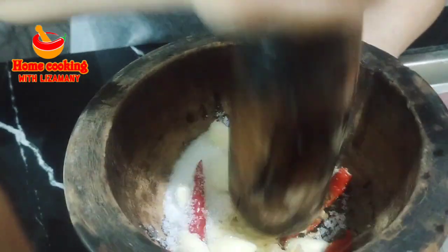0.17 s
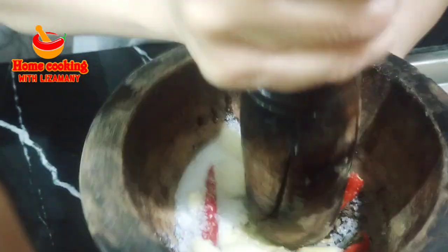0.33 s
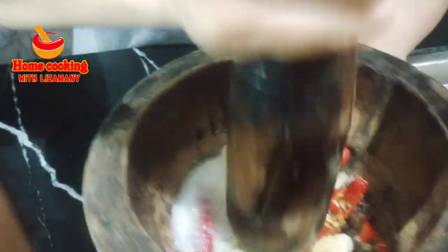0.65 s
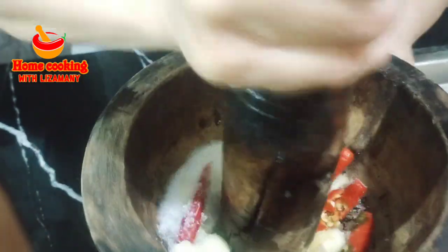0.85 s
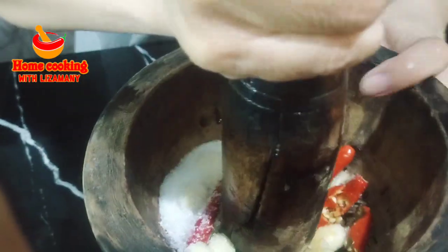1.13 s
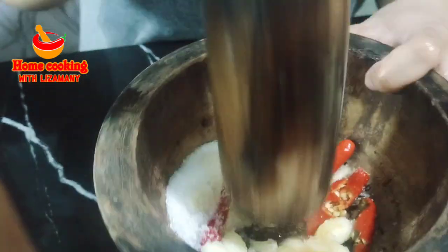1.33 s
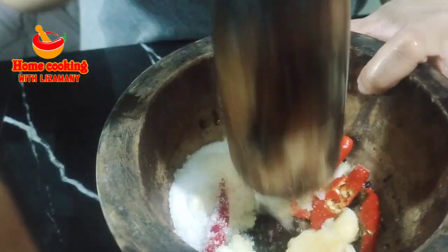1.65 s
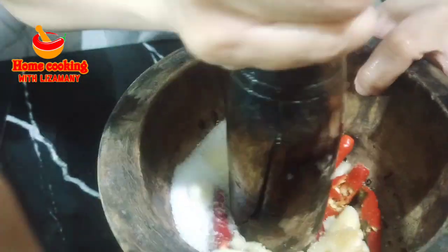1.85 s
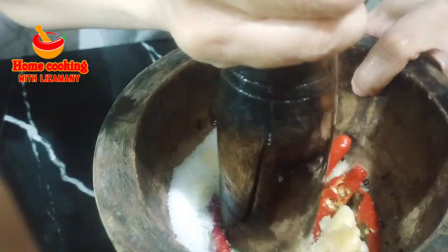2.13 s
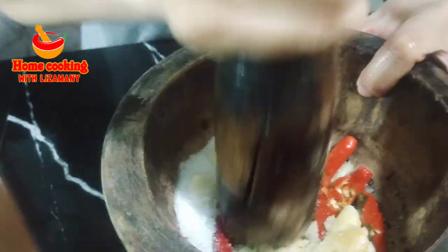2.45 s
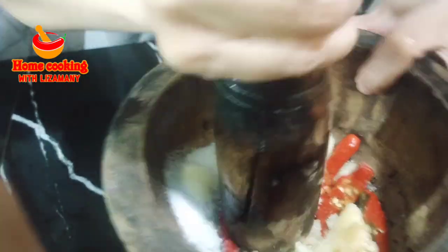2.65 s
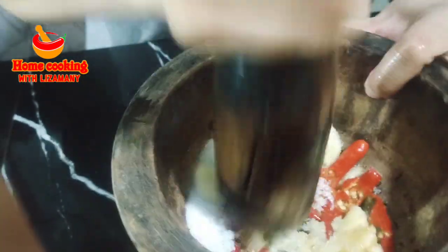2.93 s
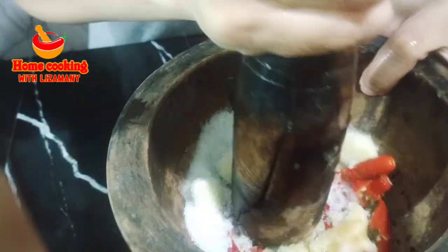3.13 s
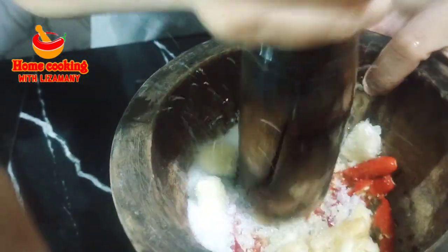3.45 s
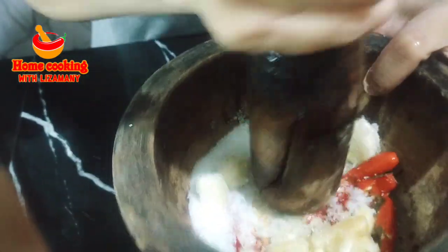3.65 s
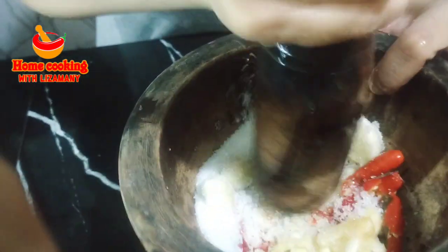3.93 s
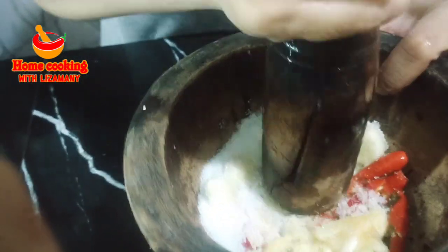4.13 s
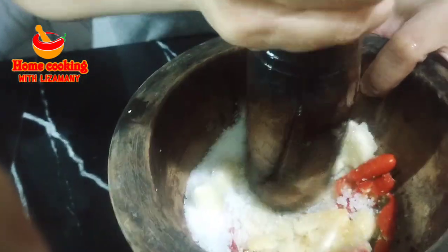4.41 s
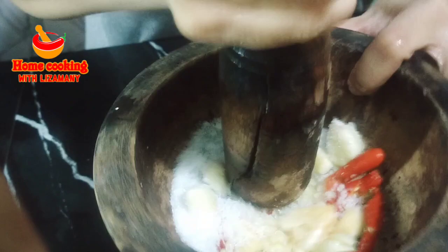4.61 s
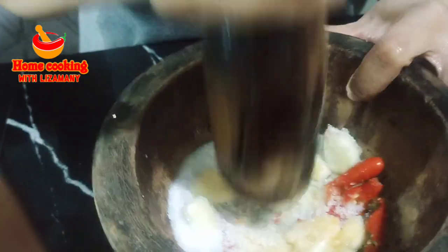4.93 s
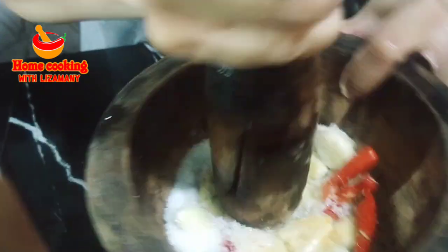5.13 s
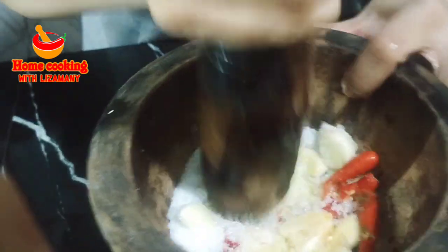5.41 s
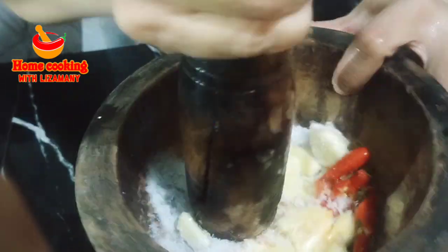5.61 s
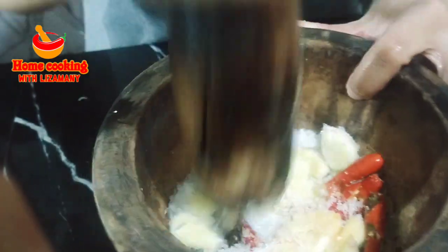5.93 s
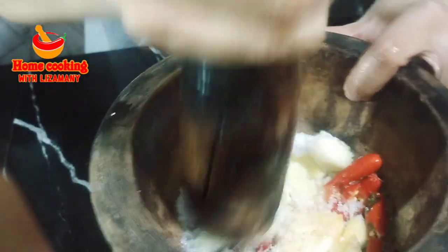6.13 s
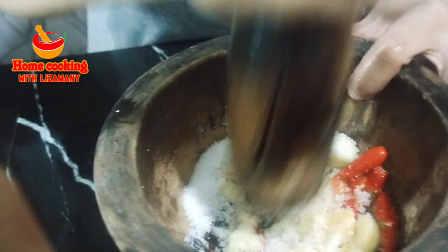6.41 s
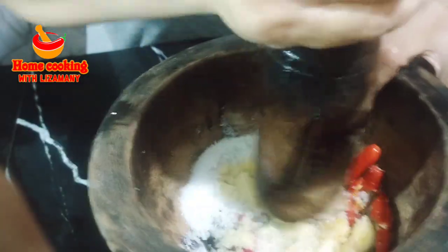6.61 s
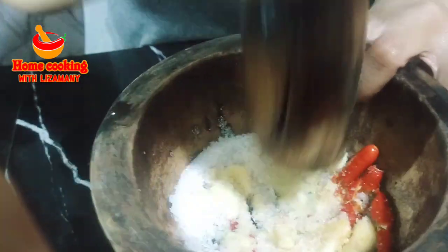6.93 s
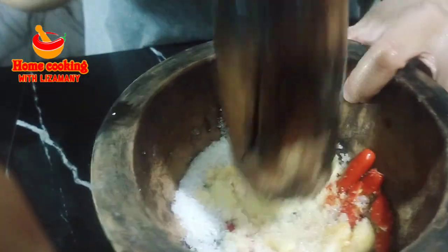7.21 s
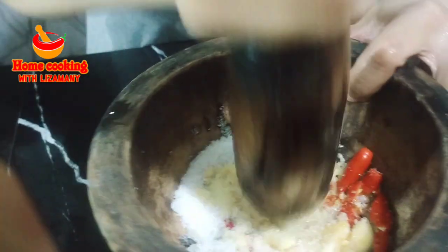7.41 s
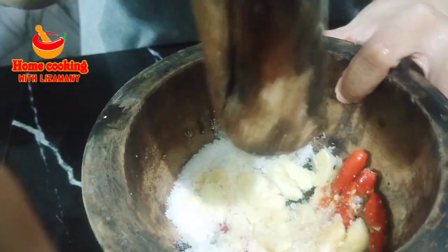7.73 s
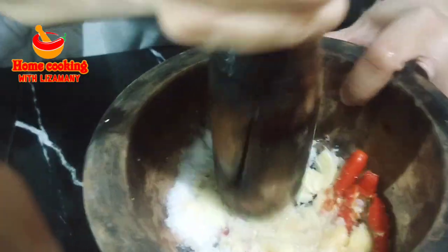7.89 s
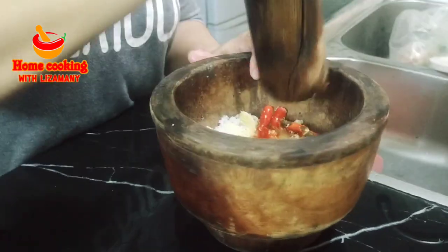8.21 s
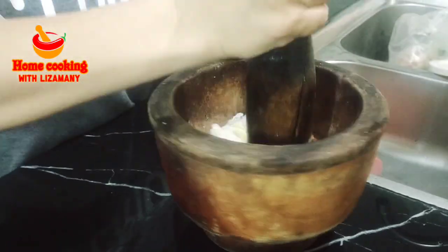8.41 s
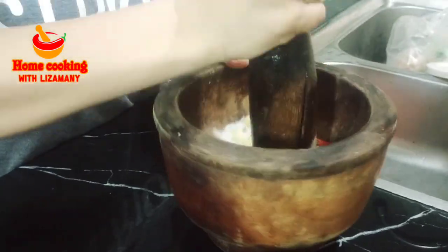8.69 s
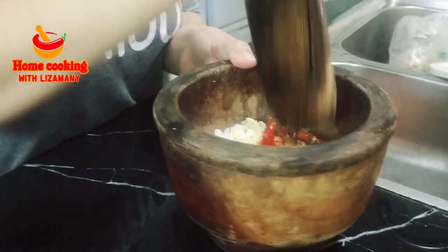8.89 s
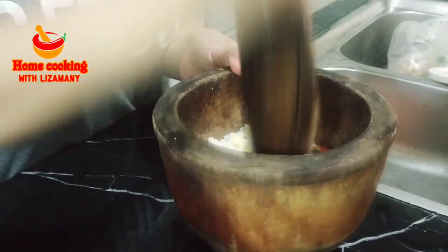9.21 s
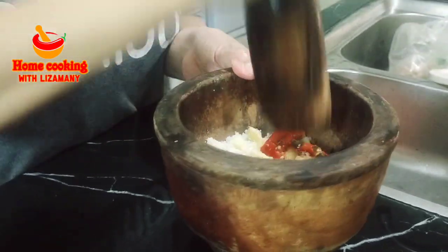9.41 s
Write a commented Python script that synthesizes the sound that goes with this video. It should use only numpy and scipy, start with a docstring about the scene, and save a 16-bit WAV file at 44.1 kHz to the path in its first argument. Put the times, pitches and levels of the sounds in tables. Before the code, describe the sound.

A wooden pestle pounds garlic, salt and chillies in a thick wooden mortar on a kitchen counter, heard close from above. At 0.0 s a very hard, hollow knock rings into the room; further woody blows follow at 0.26, 0.5, 0.57 and 0.8 s. After a gap comes a strong thud at 1.3 s, then a softer, crunchier blow at 1.7 s. From 2.0 to 7.75 s the strikes are steady, about four a second, each a short double crunch of touch and landing over a dull low thud, gritty at first, then softer and mushier. Faint low room noise lies beneath. From 7.9 to 8.4 s there is total silence. Then, from the side and further off, four brighter, more reverberant blows fall at 8.55, 8.86, 9.15 and 9.45 s, the second clearly loudest with a solid knock, over slightly stronger background hiss.

```python
"""Crunching, thudding pounding, about four blows a second; half a second of silence; then pounding from the side,
brighter and further off. A wooden pestle pounds garlic, salt and chillies in a wooden mortar on a kitchen counter.
Crunch: swarms of random grain clicks through resonances, at first touch and on landing. Wood: decaying sines.
Counter: longer low modes. Kitchen: noise tails decaying band by band. Rumbles and background: coloured noise."""
import sys
import numpy as np
from scipy import signal
from scipy.fft import rfft, irfft
from scipy.io import wavfile
from scipy.ndimage import uniform_filter1d, minimum_filter1d

SR = 44100
rng = np.random.default_rng(int(sys.argv[2]) if len(sys.argv) > 2 else 0)


def wrap_up_sound(samples):
    """Save the sound to the file named by the first command line argument, as 16-bit audio."""
    columns = np.atleast_2d(samples).T
    # keep every value between -1 and 1, then stretch to whole-number steps
    tamed = np.clip(columns, -1, 1)
    steps = np.round(tamed * 32767).astype(np.int16)
    wavfile.write(sys.argv[1], SR, steps)


N = 421155
TIME = np.arange(N) / SR
SILENCE_FROM_S, SILENCE_TO_S = 7.893, 8.383  # heard from above before, from the side after

# blows: landing t/s, time to sink through the food/s, touch crunch/dB, landing crunch/dB, grittiness/dB,
# thud f/Hz, thud energy/dB, knock energy/dB
BLOWS = [(.023, 0.0015, -18, 1, 20.5, 270, 11.5, 19.5), (0.2607, 0.011, -4.5, 2.5, 17, 256, 11.5, -2),
         (0.504, 0.008, -4, -9, 16.5, 234, 4.5, 1), (0.5676, 0.00085, -5, -13, 19.5, 233, 8, 5),
         (.785, .013, -1, -2, 18, 227, -6, -17.5), (1.339, 0.0091, -6, 7, 6.5, 251, 8, 9),
         (1.709, 0.016, 2, 0, 13, 270, -18, -5), (2.0063, 0.0069, -1.5, 4, 13.5, 202, -11.5, -8),
         (2.285, .0055, 1.5, 3.5, 10.5, 190, -5, -4), (2.542, 0.0059, 4, 3, 13, 221, -2, -5.5),
         (2.788, 0.0033, 3.5, 6, 6, 220, 1, -7.5), (3.046, .012, 4.5, 0, 3, 237, -6, -6),
         (3.299, .004, -2.5, 6, 1.5, 219, -9.5, 1.5), (3.552, .001, 10.5, -1.5, -4.5, 254, -4, -15),
         (3.8093, .001, 6.5, 2, -5, 237, -1, -9.5), (4.053, 0.0089, 7.5, 4, -6, 189, -10, -6),
         (4.293, 0.0044, 6, 5.5, -11, 227, -7.5, 3.5), (4.535, 0.0087, 3.5, 5, -8.5, 213, -6, 0),
         (4.789, .009, 4.5, 3.5, -5.5, 218, 2.5, -2.5), (5.036, 0.0059, 7, 5, -3.5, 220, -2.5, -4.5),
         (5.285, .001, 7.5, -17, -9, 232, -0.5, -5.5), (5.529, .006, 3, 4.5, -0.5, 220, -6.5, -5),
         (5.771, 0.0064, 2.5, 2.5, -1, 205, -12.5, -12.5), (6.016, .006, 3, -.5, -2.5, 220, -2.5, -14),
         (6.252, .004, -0.5, 3.5, -4.5, 212, -3, -6), (6.49, .006, -8, 3.5, -5, 184, -5.5, -6),
         (6.745, .0105, -0.5, 5.5, -5.5, 218, -3, -9), (6.991, 0.012, 7.5, 5.5, 0, 252, -9.5, -5),
         (7.245, 0.0055, 2, -3, -2.5, 225, -4, -6), (7.5058, 0.0011, 7, -4.5, -8, 217, 0, -2.5),
         (7.7544, 0.0009, 1, 4.5, 0, 194, -6.5, -14), (8.555, 0.0018, -15, -14.5, 4.5, 230, -17.5, -20),
         (8.859, 0.00098, -1.5, -1.5, -9, 240, 7, 11.5), (9.155, .001, -16, -8, 3, 226, -11, -9.5),
         (9.452, 0.0011, -6.5, -4.5, 1, 206, -5, -12.5)]


def from_db(db):
    """Amplitude factor of a level in dB."""
    return 10 ** (np.asarray(db) / 20)


def unit_energy(x):
    """Scale to a sum of squares of 1."""
    return x / np.sqrt(np.sum(x ** 2) + 1e-20)


def add(track, start_s, sound):
    """Mix a sound into the track from start_s on, clipped to its ends."""
    start = round(start_s * SR)
    first, last = max(start, 0), min(start + len(sound), N)
    track[first:last] += sound[first - start:last - start]


def band(x, low_hz, high_hz):
    """Causal band-pass."""
    edges_hz = [max(low_hz, 15), min(high_hz, .48 * SR)]
    return signal.sosfilt(signal.butter(2, edges_hz, "band", fs=SR, output="sos"), x)


def resonances(table, size=1024):
    """Click response of broad resonances in parallel, with alternating signs."""
    click = signal.unit_impulse(size)
    response = np.zeros(size)
    for k, (hz, width_hz, db) in enumerate(table):
        response += from_db(db) * (-1) ** k * band(click, hz - width_hz / 2, hz + width_hz / 2)
    return response


def mode(hz, t60_s, rise_s, size=4096):
    """A dying sine of unit energy that swells while the contact lasts."""
    t = TIME[:size]
    swell = 1 - np.exp(-(t / rise_s) ** 2)
    return unit_energy(np.sin(2 * np.pi * hz * t) * from_db(-60 * t / t60_s) * swell)


def hush(spectrum):
    """Steady noise of rms 1, its spectrum interpolated over log frequency."""
    hz, db = np.transpose(spectrum)
    bins_hz = np.maximum(np.fft.rfftfreq(N, 1 / SR), 1)
    gain = from_db(np.interp(np.log(bins_hz), np.log(hz), db))
    return np.sqrt(N) * unit_energy(irfft(rfft(rng.standard_normal(N)) * gain, N))


def background(side_rms_db=-45):
    """Coloured noise: from above an earlier blow's reverberation dies away, then nearly steady; steady from the side."""
    # noise colours: f/Hz, relative density/dB
    spectrum_above = [(15, -22), (25, -2), (49, -14.5), (363, -18), (405, -18), (754, -22), (936, -12.5),
                      (1130, -19), (1480, -17), (1610, -19), (2220, -14), (3520, -23), (4870, -31.5),
                      (7310, -56.5), (16000, -44.5)]
    spectrum_side = [(30, -3), (90, -3), (160, 0), (300, -7), (600, -13), (900, -11), (3000, -16),
                     (4500, -25), (6200, -29), (7800, -22), (9500, -30), (12000, -27), (15500, -21)]
    # rms from above: t/s, level/dB
    level_above = [(0, -33), (.6, -47.5), (1.1, -48.5), (1.9, -48.5), (3, -47.5), (5, -50), (7.9, -49)]
    above = from_db(np.interp(TIME, *np.transpose(level_above))) * hush(spectrum_above)
    side = from_db(side_rms_db) * hush(spectrum_side)
    return np.where(TIME < SILENCE_FROM_S, above, side)


def rumbles(band_ratio=1.4):
    """Soft low bumps and rumbles: band-passed noise under Gaussian swells."""
    # swells: centre t/s, spread/s, f/Hz, energy/dB
    swells = [(.01, 0.012, 262, -3.5), (3.359, 0.046, 128, -1), (7.062, 0.057, 49.5, -15)]
    out, t = np.zeros(N), TIME[:SR] - .5
    for centre_s, spread_s, hz, db in swells:
        noise = band(rng.standard_normal(SR), hz / band_ratio, hz * band_ratio)
        swell = noise * np.exp(-(t / (2 * spread_s)) ** 2)
        add(out, centre_s - .5, from_db(db) * unit_energy(swell))
    return out


def bursts(touch_spread_s=.0009, landing_spread_s=.0011, spread_per_sink=.12, shorten_per_db=1.2):
    """Grains give way at first touch and on landing: yields (t/s, spread/s, crunch/dB, grittiness/dB)."""
    for land_s, sink_s, touch_db, landing_db, grit_db, _, thud_db, knock_db in BLOWS:
        drawn_out_s = spread_per_sink * sink_s  # a thicker layer of food draws both bursts out
        # a blow that reaches bare wood stops dead
        shortened = from_db(-shorten_per_db * max(thud_db, knock_db, 0))
        yield land_s - sink_s, touch_spread_s + drawn_out_s, touch_db, grit_db
        yield land_s, (landing_spread_s + drawn_out_s) * shortened, landing_db, grit_db


def crunches(grains_per_s=6000, size_spread_db=0.5, spray_db=-30, spray_s=.04, swell_share=0.87, size=6144):
    """Each burst is a swarm of tiny fractures that swells, collapses and leaves a few settling grains."""
    # resonances that colour the grains: f/Hz, width/Hz, relative level/dB
    hollow = resonances([(673, 300, -2), (947, 330, 0.5), (1427, 340, -11.5), (1759, 441, 0),
                         (2430, 515, 4)])
    crack = resonances([(2665, 596, 3.5), (3334, 622, 0.0075)])
    edge = resonances([(4194, 1180, 3), (4740, 2470, -7.5), (6260, 330, -6.5)])
    salt_above = resonances([(7110, 1900, -2), (11830, 2320, 5.5), (14430, 1300, -0.5)])
    salt_side = resonances([(7250, 2130, 7), (12700, 4000, -1.5), (14950, 2100, 5.5)])
    # settling of loose grains after a burst: level/dB, decay time/s
    settle_above = (-13.5, .01)
    settle_side = (-14.5, 0.018)
    out, lead_s = np.zeros(N), .016
    t = TIME[:size] - lead_s
    for burst_s, spread_s, crunch_db, grit_db in bursts():
        side = burst_s > SILENCE_FROM_S
        settle_db, settle_s = settle_side if side else settle_above
        # energies against the crunch level, tilted by grittiness; more treble from the side
        hollow_db = -4 - .15 * grit_db
        crack_db = -3
        edge_db = -18.5 + .52 * grit_db + side * 8
        salt_db = -22 + .34 * grit_db + side * 18
        # the swell is quicker than the collapse
        width_s = max(spread_s, .0003) * np.where(t < 0, swell_share, 1)
        settling = from_db(settle_db) * (t > 0) * np.exp(-abs(t) / settle_s)
        pressure = np.exp(-(t / (2 * width_s)) ** 2) + settling
        signs = rng.choice([-1, 1], size)
        sizes = from_db(size_spread_db * np.minimum(rng.exponential(1, size), 3)) * signs
        grains = pressure * sizes * (rng.random(size) < grains_per_s / SR)
        # salt thrown aside trickles back as a fine hiss
        spray = from_db(spray_db) * (t > 0) * np.exp(-abs(t) / spray_s) * rng.standard_normal(size)
        salt = salt_side if side else salt_above
        layers = [(grains, hollow, hollow_db), (grains, crack, crack_db),
                  (grains, edge, edge_db), (grains + spray, salt, salt_db)]
        for drive, colour, db in layers:
            # energy centroid: resonances take a moment to answer
            build_up_s = np.sum(TIME[:len(colour)] * unit_energy(colour) ** 2)
            sound = unit_energy(signal.fftconvolve(drive, colour))
            add(out, burst_s - lead_s - build_up_s, from_db(crunch_db + db) * sound)
    return out


def blows(thud_t60_s=.038, wall_hz=470, wall_t60_s=0.03, knock_hz=822, knock_t60_s=0.019, rise_s=0.0014,
          push_hz=85, push_db=-11, push_t60_s=0.02, detune=.06, pinned_per_db=.32, brighten_per_db=1.05):
    """The mortar thuds on the counter, its wall and hollow knock; returns direct sound and room send."""
    # further bowl modes: f/Hz before detuning, energy/dB against the knock before brightening, t60/s
    overtones = [(597, -8, 0.0079), (921, -13.5, 0.19), (1101, -14.5, 0.0063), (1528, -22.5, 0.0044)]
    direct, sent = np.zeros(N), np.zeros(N)
    for land_s, *_, thud_hz, thud_db, knock_db in BLOWS:
        thud_room_db, knock_room_db = (-3.5, -6) if land_s < SILENCE_FROM_S else (-1, 2.5)
        thud_room_db -= pinned_per_db * thud_db  # a hard blow pins the mortar to the counter
        wall_db = -8 + 1.33 * thud_db  # the wall joins in more as the thud grows
        # the pestle loads the bowl differently each time, which shifts its modes a little
        shift = 1 + detune * rng.standard_normal(len(overtones) + 2)
        push_level_db = min(thud_db, 1) + push_db  # the arm's weight limits the push
        parts = [(push_hz, push_level_db, push_t60_s, thud_room_db),
                 (thud_hz, thud_db, thud_t60_s, thud_room_db),
                 (wall_hz * shift[-1], wall_db, wall_t60_s, thud_room_db),
                 (knock_hz * np.sqrt(shift[-2]), knock_db, knock_t60_s, knock_room_db)]
        # a hard knock is a short contact, so overtones above it gain
        db_per_octave = brighten_per_db * max(knock_db, 0)
        for (hz, db, t60_s), k in zip(overtones, shift):
            octaves = np.clip(np.log2(hz / knock_hz), 0, .42)
            parts.append((hz * k, knock_db + db + db_per_octave * octaves, t60_s, knock_room_db))
        for hz, db, t60_s, room_db in parts:
            # the strike point decides whether a mode starts outwards or inwards
            ring = rng.choice([-1, 1]) * from_db(db) * mode(hz, t60_s, rise_s)
            add(direct, land_s, ring)
            add(sent, land_s, from_db(room_db) * ring)
    return direct, sent


def counter(x, ring_db=-21, rise_s=0.00409):
    """Low modes of mortar and counter hum on after each blow."""
    # modes: f/Hz, relative energy/dB, t60/s
    modes = [(163, -2.5, 0.98), (194.4, -7.5, 0.33), (211.3, -4.5, 0.2), (266.8, -17, 0.77), (345.7, 0, 1),
             (425, -1, 0.36), (949, -6.5, 1)]
    response = sum(from_db(db + ring_db) * mode(hz, t60_s, rise_s, size=SR) for hz, db, t60_s in modes)
    return signal.fftconvolve(x, response)[:N]


def kitchen(x, first_s=0.0019, early_db=12.5, early_s=0.016):
    """Dense reflections dying band by band, with strong ones from near by at the start."""
    # reverberation: f/Hz, level/dB, t60/s
    reverberation = [(60, -9.5, 0.71), (119, 2, 0.53), (187.6, 0.5, 0.92), (301, 3.5, 0.78),
                     (500, 8.5, 0.95), (890, -2, 0.87), (1430, 7.5, 1), (3350, 6, 1), (5300, 14.5, 0.84),
                     (8630, 2, 0.97), (12700, 27.5, 0.43), (16000, -1, .45)]
    t, edges_hz, response = TIME[:SR], np.geomspace(45, 17000, num=18), 0
    hz, level_db, t60_s = np.transpose(reverberation)
    shape = (1 - np.exp(-(t / first_s) ** 2)) * from_db(early_db * np.exp(-t / early_s))
    for low_hz, high_hz in zip(edges_hz, edges_hz[1:]):
        log_centre = np.log(low_hz * high_hz) / 2
        db = np.interp(log_centre, np.log(hz), level_db)
        decay_s = np.interp(log_centre, np.log(hz), t60_s)
        noise = rng.standard_normal(len(t)) * shape * from_db(-60 * t / decay_s)
        tail = unit_energy(band(noise, low_hz, high_hz))
        response = response + from_db(db) * np.sqrt(2 * (high_hz - low_hz) / SR) * tail
    return signal.fftconvolve(x, response)[:N]


def limiter(x, ceiling=0.43, hold_s=0.032, release_db_per_s=150, size=65):
    """Peaks above the ceiling push the gain down; it is held, then recovers at a fixed dB rate."""
    over_db = 20 * np.log10(np.maximum(abs(x) / ceiling, 1))
    half = int(hold_s * SR / 2)
    held_db = -minimum_filter1d(-over_db, 2 * half + 1, origin=half, mode="constant")
    ramp_db = release_db_per_s * TIME
    cut_db = np.maximum.accumulate(held_db + ramp_db, axis=-1) - ramp_db
    gain_db = uniform_filter1d(minimum_filter1d(-cut_db, size), size)  # smoothed, with look-ahead
    return x * from_db(gain_db)


def scene(crunch_room_above_db=-17, crunch_room_side_db=-4, draws=3):
    """Crunch and wood in the kitchen, over its background noise."""
    wood, wood_sent = blows()
    room_db = np.where(TIME < SILENCE_FROM_S, crunch_room_above_db, crunch_room_side_db)
    crunch_send = from_db(room_db)
    # independent draws of grains and tail are averaged in power, for a smooth reverberation
    room = sum(kitchen(crunch_send * crunches() + wood_sent) for _ in range(draws))
    room = room / np.sqrt(draws)
    return (crunches() + wood + counter(wood_sent) + room + rumbles() + background())[None]


def record(dry, cutoff_hz=16000):
    """Peaks are limited, the sound stops between the two positions, the top is cut."""
    running = uniform_filter1d(((TIME < SILENCE_FROM_S) | (TIME > SILENCE_TO_S)) * 1., size=64)
    low_pass = signal.ellip(10, .2, 70, cutoff_hz, fs=SR, output="sos")
    return signal.sosfilt(low_pass, limiter(dry) * running)


dry = scene()
out = record(dry)
wrap_up_sound(out)
```